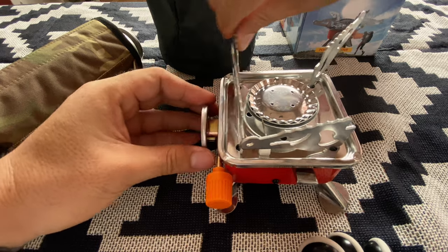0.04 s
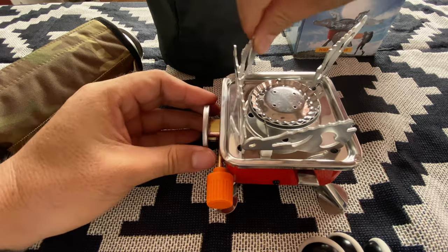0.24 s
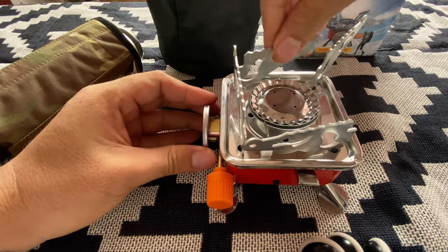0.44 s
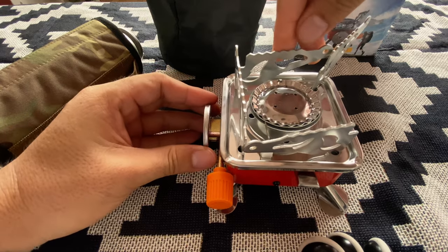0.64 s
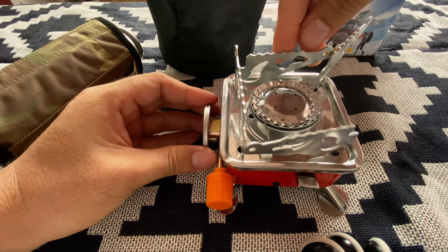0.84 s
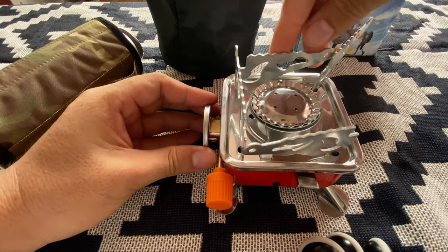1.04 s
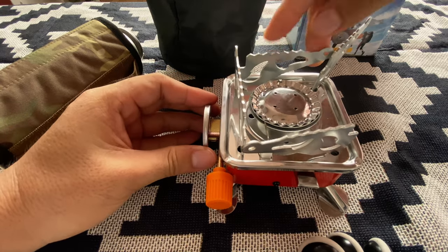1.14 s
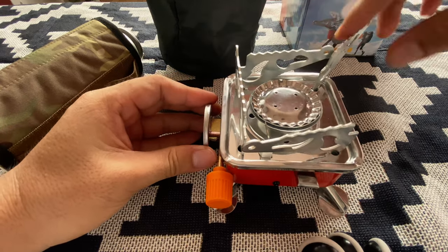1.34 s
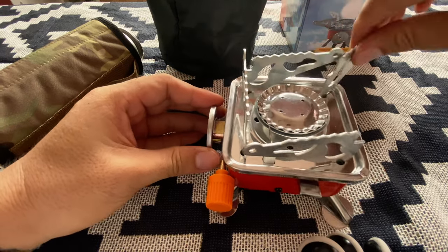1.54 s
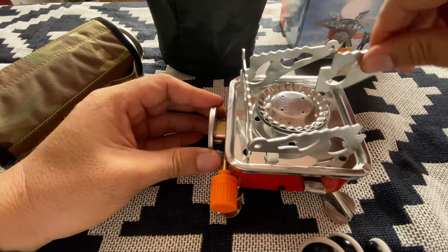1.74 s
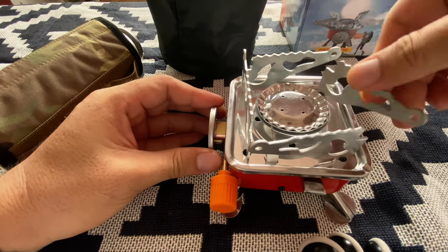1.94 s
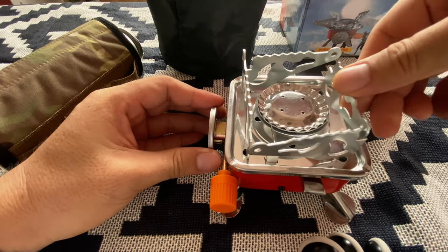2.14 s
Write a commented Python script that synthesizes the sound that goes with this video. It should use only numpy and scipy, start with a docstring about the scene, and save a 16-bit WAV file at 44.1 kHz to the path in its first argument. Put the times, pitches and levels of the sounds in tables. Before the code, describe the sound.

Hard metallic snaps of steel stove supports against a thin tray, then faint clinks and scrapes

```python
"""A faint clink and scrape, then hard metallic snaps: the steel pan supports of a small camping stove
are folded by hand, close to a camera. The supports snap against the thin steel tray, which rings near
1.4 kHz, and clink and scrape in their hinges: swelling knocks, decaying modes, bursts of noise and tiny
slips. One hinge groans, slips through a gliding resonance. A low hum, noise and wavering tones, fills
the small room, which answers the stove with a short echo."""
import sys
import numpy as np
from scipy import signal
from scipy.fft import rfft, irfft, next_fast_len
from scipy.io import wavfile

SR = 44100
rng = np.random.default_rng(int(sys.argv[2]) if len(sys.argv) > 2 else 0)


def magnitude_from_level(level_db):
    """Linear magnitude for a level in decibels (20 dB per decade)."""
    exponent = np.asarray(level_db, float) / 20
    return 10 ** exponent


def wav_record(signal):
    """Record a signal, one row per channel, as 16-bit PCM in the file named by sys.argv[1]."""
    frames = np.transpose(np.atleast_2d(signal))
    bounded = np.clip(frames, -1, 1)
    # unit amplitude maps onto the largest positive 16-bit level
    quanta = np.round(bounded * 32767).astype(np.int16)
    wavfile.write(sys.argv[1], SR, quanta)


N = 97020

# How alike left and right hear the noise of metal on metal. Each row: frequency in Hz, likeness -1 to 1.
CONTACT_ALIKE = [(1400, 0.69), (2200, 1), (5000, 0.69), (8500, 0.11), (10500, 0.29), (13000, 0.32)]
CLINK_SCATTER_DB, CLINK_BLUR_HZ = 2.5, 20  # light contact: spread of mode levels, smear of support modes
PORTS = np.array([[0.5], [-0.5]])  # shares of a left-right difference at the two microphone ports


def unit(x):
    """Bring to rms 1."""
    return x / np.sqrt(np.mean(x ** 2) + 1e-20)


def along(points, hz):
    """Read (Hz, value) points on a log frequency axis."""
    f, v = np.transpose(points)
    return np.interp(np.log(hz + 1), np.log(f + 1), v)


def filtered(x, response):
    """Multiply the spectrum of x by a response of frequency."""
    m = next_fast_len(N + SR)
    return irfft(rfft(x, m) * response(np.fft.rfftfreq(m, 1 / SR)), m)[..., :N]


def pair_noise(source, spectrum, alike, favour_hz=1):
    """Mid and side from two unrelated signals, shared so that each frequency has its left-right likeness."""
    lift_top_db, lift_width = 13, 0.12  # the lift about favour_hz; width in log frequency

    def mid_side_gains(hz):
        turn = np.arccos(np.clip(along(alike, hz), -1, 1)) / 2
        lift_db = lift_top_db * np.exp(-(np.log((hz + 1) / favour_hz) / lift_width) ** 2)
        return magnitude_from_level(along(spectrum, hz) + lift_db) * [np.cos(turn), np.sin(turn)]

    mid, side = filtered(source, mid_side_gains)
    return unit(np.array([mid + side, mid - side]))


def blows():
    """All hard snaps onto the tray and light clinks of a support, each a blow with its own contact noise."""
    # Supports snapping onto the tray. Each row: start in seconds, knock level in dB, knock pitch in Hz,
    # knock length in seconds, support ring in relative dB, favoured mode in Hz, crack in relative dB.
    snap_rows = [(0.2143, -6, 1422, 0.0074, -20, 3023, -25),
                 (0.2441, -11.5, 1380, 0.0064, -23.5, 3740, -26),
                 (0.3044, -5.5, 1421, 0.0085, -15.5, 2943, -23.5),
                 (.3198, -9.5, 1358, 0.00368, -19.5, 3730, -22.5),
                 (.3234, -7, 1496, .0045, -24.5, 4090, -35.5), (.3290, -16, 1494, 0.008, -28, 5950, -50)]
    # Light clinks of a support. Each row: the same columns and units as a snap.
    clink_rows = [(.008, -35.5, 1363, 0.0036, -51, 3140, -58), (.018, -60, 1450, 0.0068, -45, 3100, -67),
                  (0.5043, -42, 1450, .006, -40, 4650, -37.5), (1.155, -34.5, 1462, 0.014, -57, 1900, -84),
                  (1.303, -33, 1410, .005, -36, 4900, -41), (1.427, -46, 1450, 0.012, -55, 4320, -57.5),
                  (1.516, -42, 1450, 0.0056, -49, 5040, -55), (1.562, -43.5, 1497, 0.015, -58.5, 2500, -67),
                  (1.590, -41, 1450, 0.0096, -49.5, 4900, -59),
                  (1.614, -40.5, 1386, 0.011, -55, 3210, -54.5), (1.647, -41, 1450, .008, -50, 2590, -58),
                  (1.918, -39, 1474, 0.0068, -49, 2550, -73), (2.1, -33, 1463, 0.013, -30, 2512, -26.5)]
    # Colour of the crack of a snap. Each row: frequency in Hz, relative level in dB per Hz.
    crack_colour = [(410, -70), (700, -44), (1460, -17.5), (2060, -27.5), (4110, -29.5), (5150, -26.5),
                    (6050, -24.5), (10300, -30), (13300, -27.5), (15600, -30.5), (16800, -63)]
    # Colour of the tick of a clink. Each row: frequency in Hz, relative level in dB per Hz.
    tick_colour = [(590, -52), (1000, -18), (1440, -1), (1780, -10), (2480, -14.5), (6240, -6.5),
                   (10000, -9), (11300, -5), (13000, -10), (15000, 1), (16800, -34)]
    snaps = sum(blow(*row, scatter_db=2, blur_hz=50, contact=crack_colour) for row in snap_rows)
    clinks = sum(blow(*row, CLINK_SCATTER_DB, CLINK_BLUR_HZ, tick_colour) for row in clink_rows)
    return snaps + clinks


def blow(s, knock_db, knock_hz, knock_s, support_db, favour_hz, crack_db, scatter_db, blur_hz, contact):
    """The tray swells while it is struck, is damped and rings on; the support rings, contact cracks and rattles."""
    lateness = 1.15  # above 1, the knock peaks late in the contact
    knock_balance_db, knock_lead = 1.5, 0.3  # left over right; radians by which left leads
    tray_ring_db, crack_lift_db = -17.5, 11.5  # ring under the knock; common lift of all crack levels
    crack_rise_s, crack_t60_s, rattle_t60_s, rattle_db = 0.00097, 0.025, 0.028, -10.5
    t = np.arange(SR // 2) / SR

    swell = np.sin(np.pi * np.clip(t / knock_s, 0, 1) ** lateness)
    knock = swell * magnitude_from_level(PORTS * knock_balance_db) * np.sin(2 * np.pi * knock_hz * t + PORTS * knock_lead)
    tray = knock + magnitude_from_level(tray_ring_db) * tray_ring(scatter_db)
    support = support_ring(blur_hz, scatter_db, favour_hz)

    fade = magnitude_from_level(-60 * t / crack_t60_s) + magnitude_from_level(rattle_db) * magnitude_from_level(-60 * t / rattle_t60_s)
    noise = pair_noise(rng.standard_normal((2, N)), contact, CONTACT_ALIKE, favour_hz)[:, :len(t)]
    crack = (1 - np.exp(-t / crack_rise_s)) ** 2 * fade * noise

    out = np.zeros((2, N + SR))
    start = round(s * SR)
    out[:, start:start + len(t)] = (magnitude_from_level(knock_db) * tray + magnitude_from_level(support_db) * support
                                    + magnitude_from_level(crack_db + crack_lift_db) * crack)
    return out[:, :N]


def tray_ring(scatter_db):
    """The thin tray's modes, each radiating its own way to the two ports."""
    # Modes of the tray. Each row: frequency in Hz, relative level in dB, t60 in seconds,
    # left over right in dB, radians by which left leads.
    tray_modes = [(1114, -13, 0.21, -6.5, 0.21), (1235.5, -4.5, 0.14, 10.5, 0.2),
                  (1334, 5.5, 0.05, -3, 0.1), (1380, -5, 0.063, -6, .3), (1477.6, 4.5, 0.086, 2.5, 0.34),
                  (1556, 3, 0.1, 5.5, .5), (1450, -20.5, 1.3, 1.5, 1), (1753, -11, 0.087, 6, 0.0023),
                  (1050, -14, 0.11, 0, 0.085)]
    return ring(tray_modes, rise_s=0.0015, blur_hz=3, scatter_db=scatter_db)


def support_ring(blur_hz, scatter_db, favour_hz):
    """The support's modes, those near the favoured frequency lifted by the point of contact."""
    # Modes of a support. Each row: frequency in Hz, relative level in dB, t60 in seconds,
    # left over right in dB, radians by which left leads.
    support_modes = [(2314, -3.5, 0.07, 2.5, 4), (2512, -20.5, 0.23, 9, 4), (2590, -17.5, 0.2, -3, 5.5),
                     (3039, -10, .06, 1.5, 1), (3128, -8, 0.065, 6, 1.87), (3265, -15.5, 0.19, 9.5, 1.5),
                     (3544, -3, 0.037, 7, 1.03), (3890, -34.5, .3, -2, -9.5), (4054, -5, 0.025, -4, -.3),
                     (4400, -13, 0.083, 15, -5.5), (4900, -12, 0.041, 11.5, 4), (5950, -6, 0.041, 4, 0.56),
                     (6310, -9.5, 0.082, 8, -3.5), (7340, -12, 0.042, 1, 0.6), (8500, -16, 0.064, -8, -1.7),
                     (11900, -29, 0.045, -7, .1)]
    return ring(support_modes, 0.0003, blur_hz, scatter_db, favour_hz)


def ring(modes, rise_s, blur_hz, scatter_db, favour_hz=1):
    """One blow's ringing at both ports: decaying sines, smeared by loose joints as a random phase drift."""
    favour_db, favour_width = 15, 0.035  # lift of nearby modes; width in log frequency
    t = np.arange(SR // 2) / SR
    hz, db, t60, balance_db, lead = np.transpose(modes)[:, :, None]
    favour = favour_db * np.exp(-(np.log(hz / favour_hz) / favour_width) ** 2)
    db = db + scatter_db * rng.standard_normal(db.shape) + favour
    fading = magnitude_from_level(db - 60 * t / t60)
    drift_step = np.sqrt(2 * np.pi * blur_hz / SR)
    phase = 2 * np.pi * hz * t + drift_step * np.cumsum(rng.standard_normal(fading.shape), axis=1)
    ports = [np.sum(fading * magnitude_from_level(k * balance_db) * np.sin(phase + k * lead), axis=0) for k in PORTS[:, 0]]
    return (1 - np.exp(-t / rise_s)) * np.array(ports)


def slips(per_s, spread_db):
    """Random impulses of either sign and uneven size, rms 1."""
    happens = rng.random(N) < per_s / SR
    size = magnitude_from_level(spread_db * np.minimum(rng.exponential(size=N), 2))
    return unit(happens * rng.choice([-1, 1], size=N) * size)


def rung(slip, ringing):
    """Let every slip set off the same ringing, scaled to unit energy at the left port."""
    return signal.fftconvolve(slip[None], ringing / np.linalg.norm(ringing[0]), axes=1)[:, :N]


def scrape():
    """Tiny slips in the hinges ring tray and supports and rasp in the treble."""
    # Colour of the rasp. Each row: frequency in Hz, relative level in dB per Hz.
    rasp_colour = [(1180, -9), (2000, -1.5), (2750, -6.5), (3140, -20), (3780, -10.5), (11500, -17.5),
                   (13000, -30), (15100, -15), (16100, -28), (16500, -60.5)]
    # Strokes of a hinge. Each row: start in seconds, length in seconds, tray in relative dB,
    # support in relative dB, favoured mode in Hz, rasp in dB.
    stroke_rows = [(0, 0.057, -46, -51, 3150, -52.5), (0.333, 0.29, -53.5, -51, 3900, -67),
                   (0.833, 0.11, -53, -62, 2320, -85), (1.106, .14, -54, -68, 3550, -62.5),
                   (1.295, 0.086, -55.5, -55.5, 3330, -52.5), (1.366, 0.1, -62, -54, 2520, -54),
                   (1.46, 0.1, -49, -75, 2500, -57), (1.554, 0.17, -48, -59.5, 4900, -52.5),
                   (1.6, 0.036, -64, -50.5, 3160, -67), (1.632, 0.059, -56, -53.5, 2590, -65),
                   (1.68, 0.24, -56, -60.5, 3200, -63), (1.847, 0.077, -54, -47, 3055, -54.5),
                   (1.892, 0.057, -49, -52, 2550, -55.5), (2.028, .2, -54, -53, 3250, -56.5)]
    grit = np.array([slips(per_s=3000, spread_db=3) for _ in range(2)])
    rasp = pair_noise(grit, rasp_colour, CONTACT_ALIKE)
    out = np.zeros((2, N))
    for s, length, tray_db, support_db, favour_hz, rasp_db in stroke_rows:
        swell = np.sin(np.pi * np.clip((np.arange(N) / SR - s) / length, 0, 1)) ** 2
        tray = rung(grit[0] * swell, tray_ring(CLINK_SCATTER_DB))
        support = rung(grit[1] * swell, support_ring(CLINK_BLUR_HZ, CLINK_SCATTER_DB, favour_hz))
        out += magnitude_from_level(tray_db) * tray + magnitude_from_level(support_db) * support + magnitude_from_level(rasp_db) * swell * rasp
    return out


def groan():
    """One hinge groans as it turns: slips heard through one resonance that glides."""
    # Path of the groan. Each row: time in seconds, level in dB, pitch in Hz.
    groan_path = [(1.74, -45, 1238), (1.77, -58, 1250), (1.788, -56, 1250), (1.848, -53.5, 1160),
                  (1.886, -33.5, 1216), (1.944, -50.5, 1339), (1.97, -62, 1270)]
    width_hz, fade_s = 330, 0.025
    t = np.arange(N) / SR
    s, db, hz = np.transpose(groan_path)
    level_db, pitch_hz = np.interp(t, s, db), np.interp(t, s, hz)
    kicks = np.array([slips(per_s=1200, spread_db=1.5) for _ in range(2)])
    # two slow signals ride on the cosine and sine of the gliding pitch
    a, b = unit(filtered(kicks, lambda f: 1 / (1 + 2j * f / width_hz) ** 2))
    turn = 2 * np.pi * np.cumsum(pitch_hz) / SR
    fade = np.clip(np.minimum(t - s[0], s[-1] - t) / fade_s, 0, 1)
    return fade * magnitude_from_level(level_db) * (a * np.cos(turn) + b * np.sin(turn))


def room(x):
    """The small room's answer: a noise tail in which each frequency dies at its own speed."""
    # Decay of the room. Each row: frequency in Hz, t60 in seconds.
    decay_times = [(500, 0.97), (1500, 0.29), (4000, 0.32), (10000, 0.19)]
    hz, t, z = signal.stft(rng.standard_normal((2, SR // 2)), SR, nperseg=256)
    fading = magnitude_from_level(-60 * t / along(decay_times, hz)[:, None])
    tail = signal.istft(z * fading, SR, nperseg=256)[1]
    late = np.pad(x, ((0, 0), (200, 0)))  # the answer comes 200 samples later
    return signal.fftconvolve(late, tail / np.linalg.norm(tail[0]), axes=1)[:, :N]


def hum():
    """Broad rumble and hiss of the room, coloured noise, with a few wavering motor tones, narrow noise."""
    # Colour of the room's noise. Each row: frequency in Hz, relative level in dB per Hz.
    hum_colour = [(12, -39), (20, -15.5), (48, -3), (137, -6.5), (180, -17), (236, -15), (277, -21.5),
                  (317, -16.5), (363, -23.5), (913, -25), (1260, -26.5), (1570, -31.5), (1850, -35),
                  (5040, -43), (13000, -59)]
    # How alike left and right hear it. Each row: frequency in Hz, likeness -1 to 1.
    hum_alike = [(60, 0.92), (150, 0.87), (380, 0.27), (950, -0.42), (2380, -0.057), (5980, -0.4),
                 (15000, -0.5)]
    # Its balance. Each row: frequency in Hz, left over right in dB.
    hum_balance = [(60, -2.5), (180, 3.5), (550, 2.5), (1650, 1.5), (4970, 4.5), (15000, 2.5)]
    # Wavering motor tones. Each row: frequency in Hz, width in Hz, level in dB.
    motor_tones = [(59, 11, -50.5), (125.5, 9, -52.5), (239, 8, -60.5)]
    top_hz = 12140
    pair = pair_noise(rng.standard_normal((2, N)), hum_colour, hum_alike)
    pair = filtered(pair, lambda f: magnitude_from_level(along(hum_balance, f) * PORTS) / (1 + (f / top_hz) ** 20))
    tones = np.zeros(N)
    for hz, width, db in motor_tones:
        tone = filtered(rng.standard_normal(N), lambda f: 1 / (1 + ((f - hz) / width) ** 2))
        tones += magnitude_from_level(db) * unit(tone)
    return magnitude_from_level(-41) * pair + tones


def scene():
    """The stove close by, its echo 13.5 dB down and the hum behind."""
    stove = blows() + scrape() + groan()
    return stove + magnitude_from_level(-13.5) * room(stove) + hum()


def low_pass(x):
    """Removes everything above the highest recorded frequency."""
    return signal.sosfilt(signal.butter(12, 17000, fs=SR, output="sos"), x)


def record(dry):
    """The camera's microphone is deaf to a band of the treble, and the camera cuts the deepest bass."""
    dip_hz, dip_width_hz, dip_db = 13100, 1150, -14
    low_cut_hz = 29.7
    dipped = filtered(dry, lambda hz: magnitude_from_level(dip_db * np.exp(-((hz - dip_hz) / dip_width_hz) ** 4)))
    mix = filtered(dipped, lambda hz: 1 - 1 / (1 + (hz / low_cut_hz) ** 10))
    return low_pass(mix)


dry = scene()
out = record(dry)
wav_record(out)
```